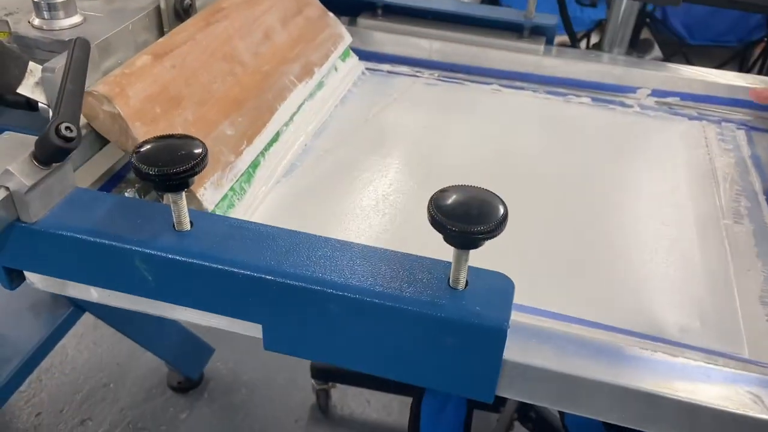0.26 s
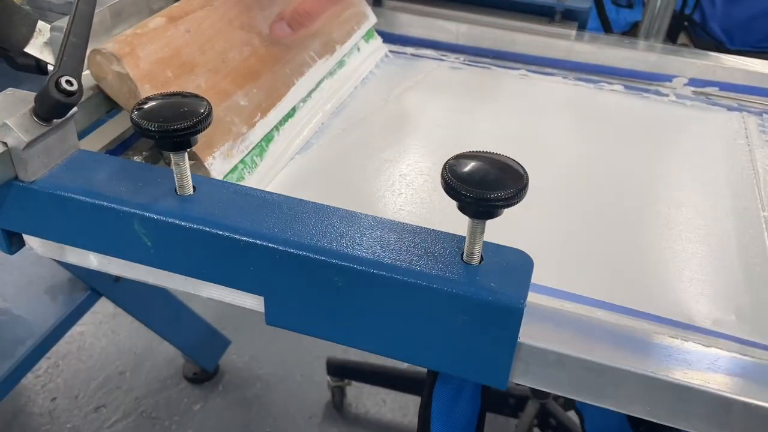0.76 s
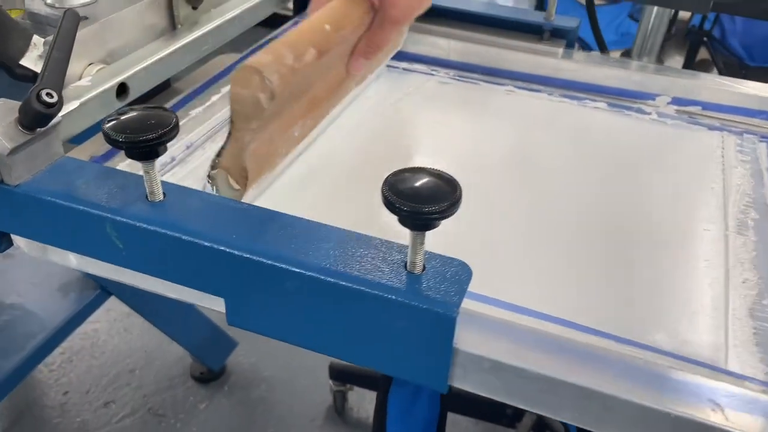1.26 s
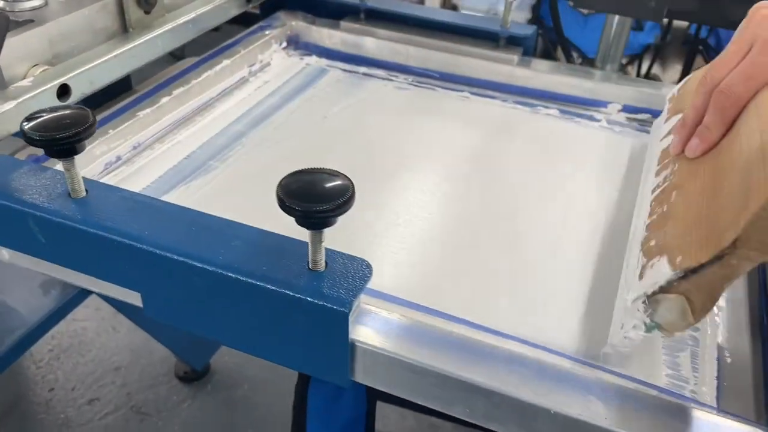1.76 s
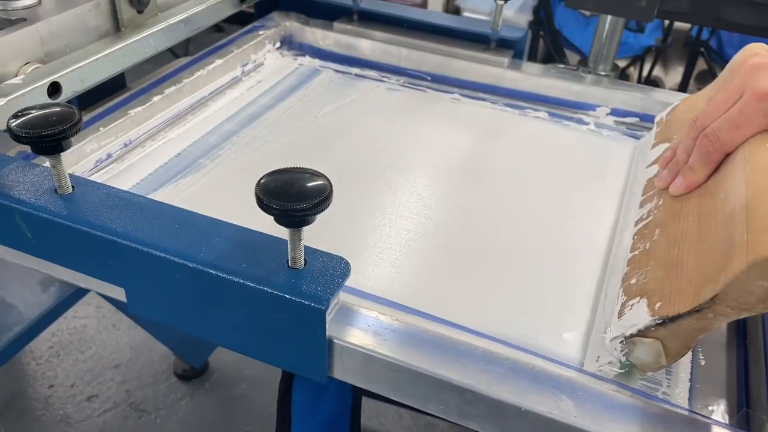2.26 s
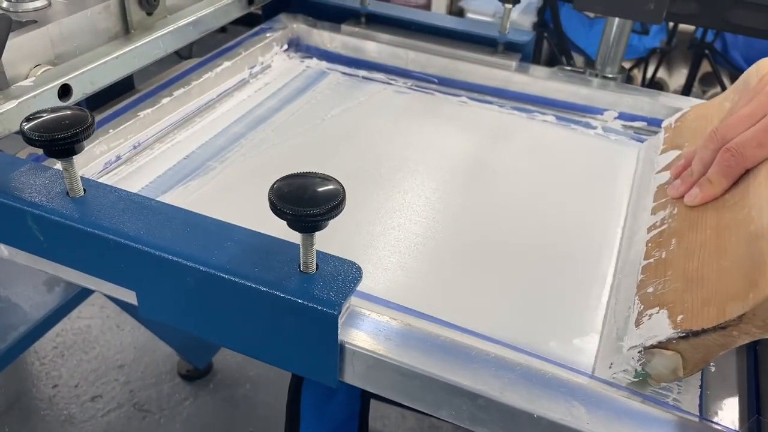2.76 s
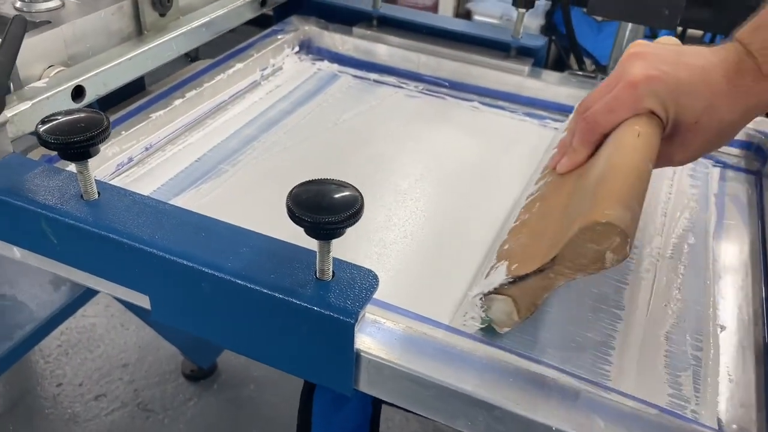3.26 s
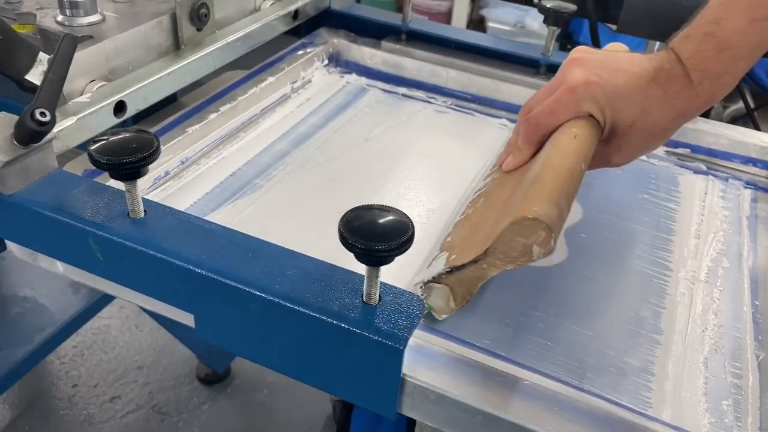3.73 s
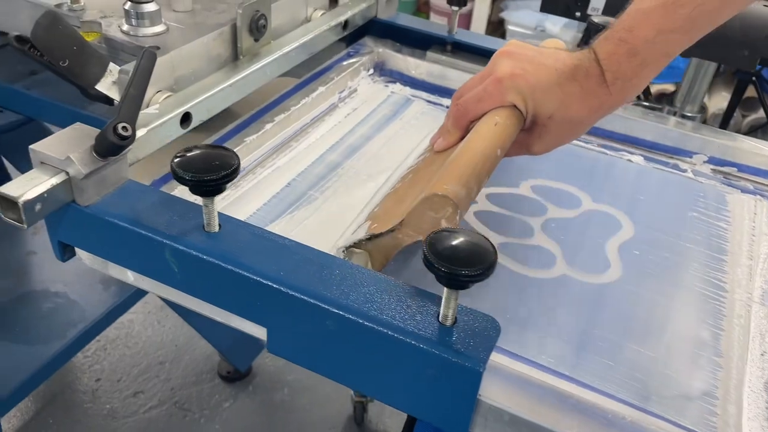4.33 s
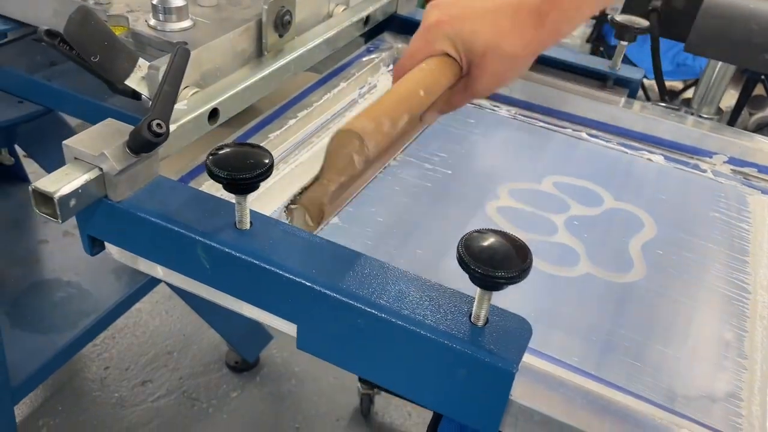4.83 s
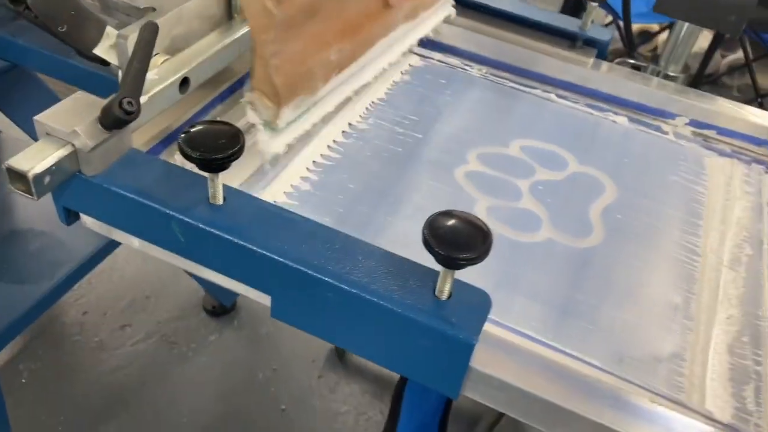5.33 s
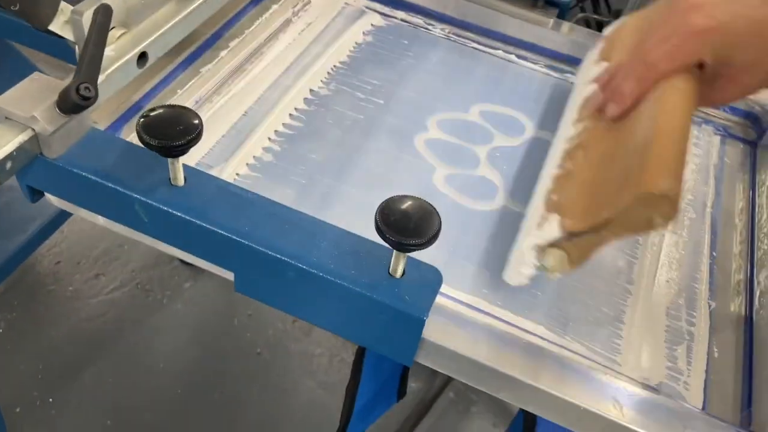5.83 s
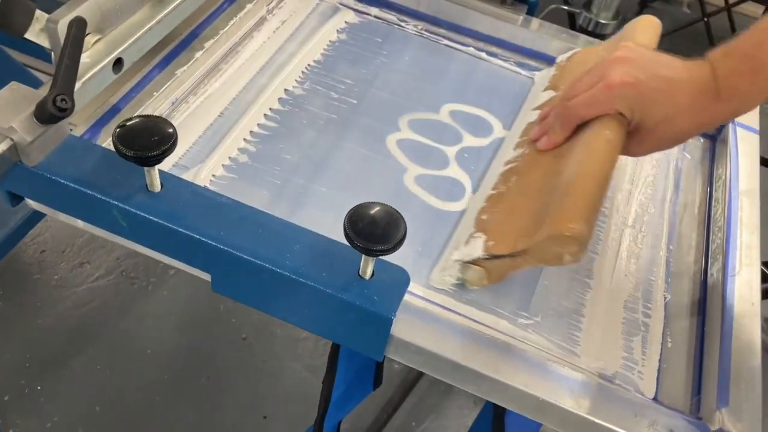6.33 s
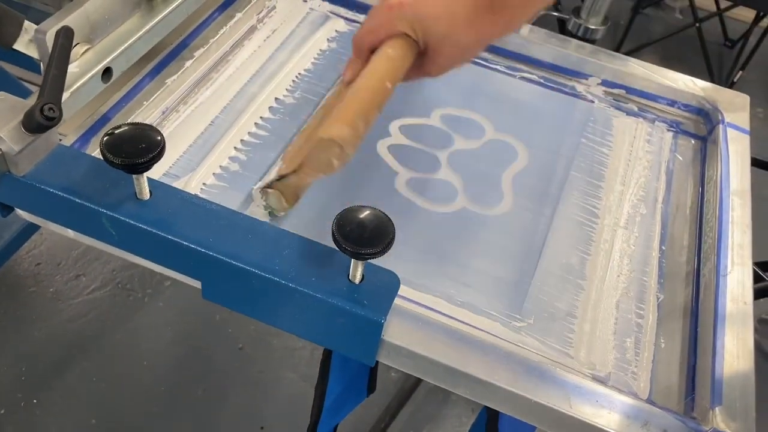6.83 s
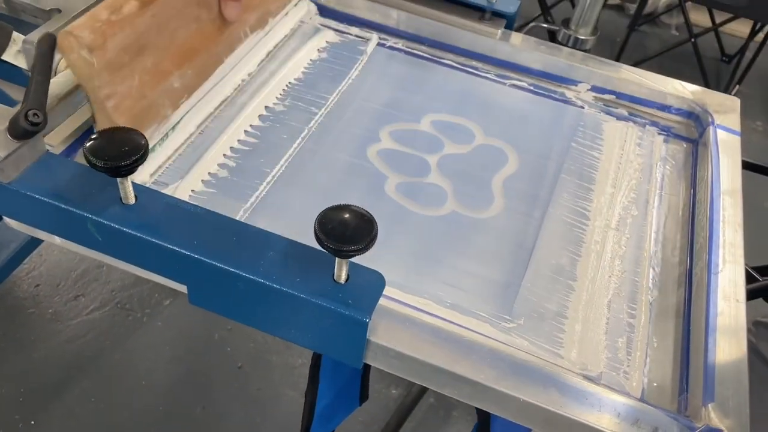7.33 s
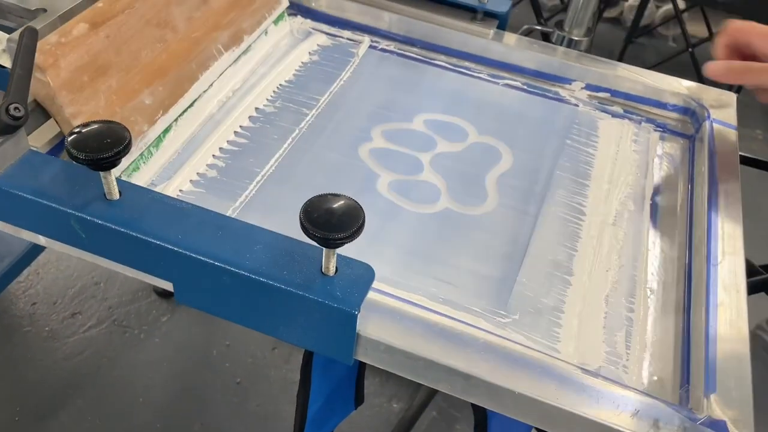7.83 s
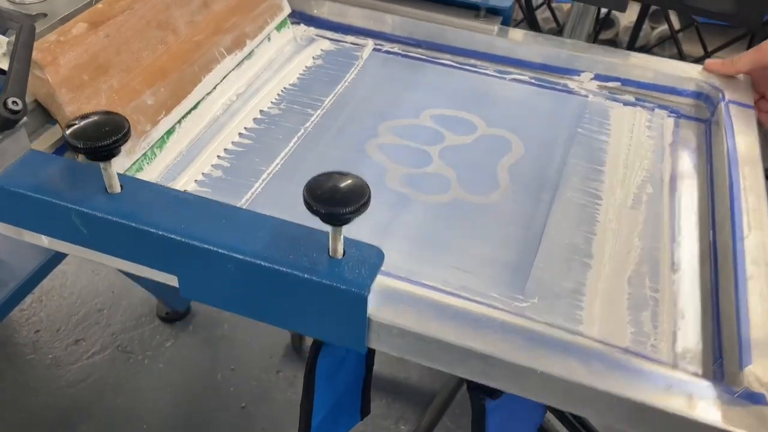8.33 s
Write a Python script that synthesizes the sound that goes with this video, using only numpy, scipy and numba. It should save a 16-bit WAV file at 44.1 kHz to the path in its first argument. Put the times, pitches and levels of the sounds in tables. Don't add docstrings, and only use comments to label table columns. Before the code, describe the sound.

A rubber squeegee sings across an inked mesh screen in two wavering strokes, with knocks, sticky smacks and metal ticks over steady fan rumble.

```python
import sys
import numpy as np
from scipy import signal
from scipy.fft import rfft, irfft
from scipy.io import wavfile
from scipy.ndimage import uniform_filter1d
from numba import njit

SR = 44100
rng = np.random.default_rng(int(sys.argv[2]) if len(sys.argv) > 2 else 0)


def persist_wave(psi):
    counts = np.round(np.clip(psi, -1, 1) * 32767).astype(np.int16)
    wavfile.write(sys.argv[1], SR, np.atleast_2d(counts).T)


def amplitude_ratio(level_db):
    exponent = np.asarray(level_db, float) / 20
    return 10 ** exponent


N = 378364
T = np.arange(N) / SR


def level(x, db):
    return x * amplitude_ratio(db) / np.sqrt(np.mean(x ** 2))


@njit
def svf(x, hz, width_hz):
    y, band_state, low_state = np.empty(len(x)), 0., 0.
    for i in range(len(x)):
        g, damping = np.tan(np.pi * hz[i] / SR), width_hz[i] / hz[i]
        v = (band_state + g * (x[i] - low_state)) / (1 + g * (g + damping))
        band_state = 2 * v - band_state
        low_state = low_state + 2 * g * v
        y[i] = damping * v
    return y


def band(count, hz, share):
    hz = np.clip(hz * np.ones(count), 30, SR / 2.3)
    once = svf(rng.standard_normal(count), hz, share * hz)
    return level(svf(once, hz, share * hz), 0)


def colour(x, table):
    hz, db = np.transpose(table)
    f = np.fft.rfftfreq(len(x), 1 / SR) + 1
    gain_db = np.interp(np.log(f), np.log(hz), db, left=-90, right=-90)
    return irfft(rfft(x) * amplitude_ratio(gain_db), len(x))


def walk(rate_hz):
    k = int(SR / rate_hz)
    held = np.repeat(rng.standard_normal(N // k + 1), k)
    return level(uniform_filter1d(uniform_filter1d(held, k), k)[:N], 0)


def add(out, s, x):
    i = max(int(s * SR), 0)
    out[i:i + len(x)] += x[:len(out) - i]


def dips(rows):
    return sum(db * np.exp(-.5 * (2 * (T - s) / length_s) ** 4) for s, length_s, db in rows)


# f/Hz, density/dB
SHOP_MID = [(20, -45), (40, -5.5), (74, -2.5), (199, -8), (241, -11), (354, -21), (686, -27), (745, -22.5),
            (809, -26.5), (1700, -33.5), (2240, -32.5), (5000, -41), (5700, -47.5), (6730, -45),
            (8620, -66.5), (9900, -55), (13000, -54), (15800, -65)]
# f/Hz, density/dB
SHOP_SIDE = [(12, -48), (20, -25), (65, -2.5), (206, 0.5), (256, -1.5), (582, -8.5), (745, -1), (809, -6),
             (1330, -6), (2000, -14.5), (3650, -19), (6500, -28.5), (9030, -24.5), (11900, -39),
             (14000, -57)]


def shop(mid_db=-42, side_db=-52, duct_hz=2280, duct_db=-69.5):
    mid = level(colour(rng.standard_normal(N), SHOP_MID), mid_db)
    whistle = band(N, duct_hz * (1 + .015 * walk(4)), 0.12)
    mid = mid + amplitude_ratio(duct_db + 2 * walk(1.55)) * whistle
    side = level(colour(rng.standard_normal(N), SHOP_SIDE), side_db)
    return amplitude_ratio(.4 * walk(3)) * np.array([mid + side, mid - side])


def room(x, t60_s=.3, tail_db=-13, low_hz=220, dull_hz=4500):
    t = T[:SR // 2]
    tail = rng.standard_normal((2, len(t))) * 1000. ** (-t / t60_s) * (t > .003)
    tail = signal.lfilter(*signal.butter(2, [low_hz, dull_hz], "band", fs=SR), tail)
    tail = tail * amplitude_ratio(tail_db) / np.sqrt(np.sum(tail ** 2) / 2)
    return signal.fftconvolve(x[None], tail, axes=1)[:, :N]


# t/s, f/Hz, swell width/s, level/dB
SPRING_PARTIALS = [(8.43, 3700, .015, -63), (8.447, 3345, .008, -58), (8.475, 3430, .022, -57),
                   (8.481, 2985, .008, -49), (8.485, 5945, .022, -60), (8.495, 8910, .018, -50),
                   (8.535, 8790, .018, -51), (8.462, 12300, .01, -64), (8.54, 12050, .015, -62),
                   (8.47, 11900, .015, -64), (8.545, 2035, .02, -50), (8.577, 2335, .016, -38),
                   (8.55, 2523, .03, -54), (8.55, 2700, .03, -56), (8.517, 2960, .01, -55),
                   (8.545, 3160, .015, -55), (8.545, 4089, .018, -58), (8.575, 4400, .01, -58),
                   (8.55, 5200, .025, -59), (8.55, 5436, .025, -59), (8.55, 6080, .025, -60),
                   (8.57, 10900, .015, -63), (8.57, 13500, .008, -62), (8.578, 2560, .008, -45),
                   (.525, 13050, .015, -68), (.72, 13400, .015, -66)]


def spring(rough_db=2, rasp_db=-7):
    out, t = np.zeros(N), T[:SR // 4]
    half_s = t[-1] / 2
    for s, hz, width_s, db in SPRING_PARTIALS:
        tone = np.sqrt(2) * amplitude_ratio(rough_db * walk(90)[:len(t)]) * np.sin(2 * np.pi * hz * t)
        rasp = amplitude_ratio(rasp_db) * band(len(t), hz, 0.05)
        swell = np.exp(-.5 * ((t - half_s) / width_s) ** 2)
        add(out, s - half_s, amplitude_ratio(db) * swell * (tone + rasp))
    return out


# t/s, f/Hz, level/dB, t60/s
PINGS = [(.064, 1790, -44, .08), (0.081, 1000, -38, .04), (.086, 676, -40, 0.046), (.103, 1187, -38, .05),
         (.105, 1390, -43, .05), (.172, 813, -30.5, 0.037), (0.171, 1614, -37.5, .07),
         (.173, 2120, -41, .05), (.178, 1156, -36, .045), (8.207, 1470, -46, 0.086),
         (1.387, 1480, -39.5, 0.018), (2.166, 2380, -46, 0.1), (2.164, 2070, -49, .5),
         (2.168, 710, -41, 0.079), (2.187, 720, -38, 0.042), (2.222, 2350, -48, .06),
         (2.2743, 1950, -25.5, 0.011), (2.2795, 1570, -37, .02), (4.815, 375, -29.5, 0.047),
         (5.996, 2200, -29, 0.024), (5.996, 715, -26, 0.059), (6.819, 330, -29.5, 0.064),
         (6.874, 395, -29, 0.055), (7.364, 2030, -33, 0.033), (7.513, 4470, -39.5, 0.031),
         (7.513, 1690, -36, .04)]


def pings(rise_cycles=1.04, rough_db=2):
    out, t = np.zeros(N), T[:SR // 4]
    for s, hz, db, t60_s in PINGS:
        shape = np.minimum(t * hz / rise_cycles, 1) * 1000. ** (-t / t60_s)
        uneven = amplitude_ratio(db + rough_db * walk(250)[:len(t)])
        add(out, s, uneven * shape * np.sin(2 * np.pi * hz * t))
    return out


# t/s, level/dB, centre f/Hz, t60/s
TICKS = [(0.128, -55, 3000, .018), (2.323, -63, 3000, .025), (4.765, -60, 3000, 0.017),
         (4.776, -61, 3000, .018), (4.784, -52, 3000, 0.012), (5.995, -42.5, 3920, 0.016),
         (6.055, -57, 3000, 0.018), (0.2586, -29.5, 2440, 0.0057), (.263, -36.5, 2400, 0.02),
         (4.654, -61, 3000, .015), (4.743, -57, 3000, .015), (7.337, -40.5, 10500, .02),
         (0.271, -46, 2500, 0.025), (0.276, -43, 2500, 0.017), (1.286, -58.5, 3000, 0.044),
         (0.067, -55, 3000, .03)]
SMACKS = [
    (0.061, -47.5, 2200, 0.11),
    (.277, -55, 2300, 0.034),
    (7.331, -36.5, 1310, 0.12),
    (7.361, -37.5, 1960, 0.074),
]
TAPS = [(0.0, -45, 420, 0.5), (.07, -46, 500, 0.43), (.068, -41.5, 1130, 0.42), (.171, -38.5, 1190, 0.11),
        (.258, -34, 1380, 0.018), (1.284, -44.5, 840, 0.25), (1.293, -57, 1570, 0.12),
        (1.291, -43, 453, .15), (.258, -40, 850, 0.018), (2.162, -52.5, 2100, 0.46),
        (2.165, -51, 1290, 0.24), (4.818, -42, 570, 0.19), (5.972, -47, 800, 0.24),
        (6.092, -47, 1500, 0.13), (6.097, -41, 710, 0.064), (7.331, -41.5, 3800, 0.087),
        (8.197, -50, 1840, 0.21), (8.247, -49.5, 1630, 0.1), (8.463, -39.5, 800, 0.069),
        (8.477, -55, 1100, 0.052), (.259, -44, 517, 0.051), (6.003, -40, 626, 0.11),
        (7.516, -40, 1220, 0.08), (7.522, -40, 520, 0.22)]
SCUFFS = [(2.761, -54, 1410, 0.99), (2.93, -40, 1110, 0.23), (2.981, -50, 2900, 0.099),
          (3.209, -50, 1500, 1), (4.672, -40, 324, 0.058), (0.089, -51, 1290, 0.33),
          (4.815, -43.5, 1490, 0.12), (8.47, -47, 387, 0.14)]


def smacks(share=0.66, skirt_db=-6, tear_hz=9900):
    out, t = np.zeros(N), T[:SR // 4]
    # rise/s, tear relative to body/dB
    kinds = [(TICKS, .001, 2), (SMACKS, .005, -11), (TAPS, .0012, -30.5), (SCUFFS, .027, -41)]
    for rows, rise_s, tear_db in kinds:
        for s, db, hz, t60_s in rows:
            shape = np.minimum(t / rise_s, 1) * 1000. ** (-np.maximum(t - rise_s, 0) / t60_s)
            body = band(len(t), hz, share) + amplitude_ratio(skirt_db) * band(len(t), hz, 1.0)
            tear = amplitude_ratio(tear_db + 4.5) * band(len(t), tear_hz, 1.0)
            add(out, s, shape * amplitude_ratio(db) * (body + tear))
    return out


# f/Hz, level/dB, t60/s
SCREEN = [(131.4, 7.5, 0.35), (71, -4.5, 0.42), (212, 7, 0.033), (348, 0.5, 0.065), (700, -21, .05)]
PLATEN = [(132.6, 0.5, 0.19), (199.4, -2, 0.205), (356, -2.5, 0.064), (546, -20, 0.12), (691, -4, 0.073),
          (1070, -18, 0.02), (1410, -7.5, 0.033), (2200, 2, 0.013), (3370, -14, .015)]
RIM = [(197, -4, 0.074), (272, -3.5, 0.061), (402, 6, 0.014), (625, -2, 0.05), (990, -9, 0.027),
       (1520, 1.5, 0.023), (1840, 0, 0.018), (2950, 9, 0.024)]
HANDLE = [(91.5, -12, 0.19), (171, -14, 0.089), (228, -2, 0.04), (305, -2.5, 0.055), (384, 1.5, 0.034),
          (500, -9, 0.16), (635, -9, 0.12), (910, -7, 0.063), (1090, -9.5, 0.042), (4470, -14, .035)]
# t/s, level/dB, push softness/s, build-up/s, crack level/dB
BLOWS = [
    (1.291, -23, 0.0046, 0.01, -41.5),
    (5.995, -17, 0.0006, 0.0081, -22.5),
    (6.887, -24, 0.00056, .005, -25.5),
    (7.513, -16.5, 0.00064, 0.0044, -30),
]


def knocks(spread=0.156, crack_hz=600, crack_t60_s=0.052, crack_rise_s=0.00059, late_cycles=0.64):
    out, t = np.zeros(N), T[:SR // 2]
    for (s, db, push_s, rise_s, crack_db), body in zip(BLOWS, [SCREEN, PLATEN, RIM, HANDLE]):
        ring = np.zeros(len(t))
        for hz, mode_db, t60_s in body:
            peak_s = rise_s + late_cycles / hz
            after_s = t - peak_s
            mates_hz = hz * (1 + spread * min(hz / 400, 1) * rng.uniform(-0.8, 1, (2, 1)))
            cluster = np.sin(2 * np.pi * hz * after_s + 1)
            cluster = cluster + np.sin(2 * np.pi * mates_hz * after_s + 1).sum(0)
            shape = np.minimum(t / peak_s, 1) ** 2 * 1000. ** (-np.maximum(after_s, 0) / t60_s)
            ring = ring + amplitude_ratio(mode_db) * shape * cluster
        push = np.hanning(int(push_s * SR) + 3)
        add(out, s, amplitude_ratio(db - 8.5) * np.convolve(ring, push / push.sum()))
        crack_shape = np.minimum(t / crack_rise_s, 1) * 1000. ** (-t / crack_t60_s)
        add(out, s, amplitude_ratio(crack_db) * band(len(t), crack_hz, 2.02) * crack_shape)
    return out


# t/s, thread rate f/Hz, tremor share of speed
STROKES = [
    [(2.73, 400, 0.0), (2.849, 334, .15), (2.948, 1302, 0.0), (2.979, 1523, .033), (3.06, 1139, .06),
     (3.236, 722, .1), (3.584, 678, .085), (3.908, 985, .03), (4.16, 930, 0.0)],
    [(4.2, 605, .036), (4.297, 746, .066), (4.354, 586, 0.0), (4.441, 913, .019), (4.623, 703, .018),
     (4.71, 370, .1)],
    [(6.08, 634, 0.0), (6.173, 776, .072), (6.208, 1447, .08), (6.291, 1207, .024), (6.369, 2148, 0.0),
     (6.474, 1787, .1), (6.69, 1601, .07), (6.784, 1165, .137), (6.84, 355, 0.0)],
]
# rate f/Hz, crest t/s
TREMOR = [
    (11.98, 3.429),
    (10.84, 4.466),
    (11.59, 6.511),
]
# t/s, length/s, share of speed gained
LURCHES = [(3.185, .03, .1), (3.285, .035, -.32), (3.335, .03, .1), (3.415, .055, .17), (3.757, .05, .09),
           (3.845, .06, -.11), (6.228, .03, .04), (6.51, .03, .03), (6.738, .025, -.05), (6.765, .02, .04),
           (2.91, .03, -.1), (3.022, .03, -.08), (3.14, .025, -.04), (3.25, .03, -.05), (3.4, .025, .08),
           (3.45, .03, -.1), (3.54, .022, -.09), (3.59, .03, -.05), (3.675, .035, -.09), (3.8, .02, .04),
           (3.865, .02, -.05), (3.905, .028, .07), (3.985, .02, -.025), (4.02, .02, .03), (4.08, .06, .055),
           (4.34, .02, .07), (4.38, .02, -.05), (4.54, .025, .04), (4.69, .02, -.22), (6.165, .03, -.1),
           (6.42, .02, -.025), (6.522, .02, -.04), (6.72, .022, .08), (6.82, .02, -.3), (3.56, .02, .06),
           (3.838, .03, .04), (3.695, .014, -.06), (4.312, .02, -.05), (4.565, .016, -.04),
           (4.667, .025, .22)]


def travel():
    rows = np.vstack(STROKES)
    hz, tremor = (np.interp(T, rows[:, 0], c) for c in rows[:, 1:3].T)
    push = np.searchsorted([stroke[0][0] for stroke in STROKES[1:]], T)
    rate_hz, crest_s = np.array(TREMOR)[push].T
    lurch = sum(share * np.exp(-.5 * (2 * (T - s) / length_s) ** 2) for s, length_s, share in LURCHES)
    hz = hz * (1 + tremor * np.cos(2 * np.pi * rate_hz * (T - crest_s)) + lurch)
    moving = ((T > 2.745) & (T < 4.72)) | ((T > 6.08) & (T < 6.84))
    return uniform_filter1d(hz, 400), uniform_filter1d(1. * moving, 600)


# tone level/dB, overtone level/dB
PRESSURE = [(-50, -84), (-49, -44), (-47.5, -57), (-44, -58), (-42.5, -55), (-47, -66.5), (-46.5, -48.5),
            (-50, -55), (-50.5, -79), (-48.5, -48), (-58, -61), (-51, -52.5), (-49.5, -64), (-46.5, -53),
            (-61, -81), (-50, -69), (-56.5, -60), (-48.5, -61), (-46, -78), (-58.5, -59), (-42, -58),
            (-46, -59.5), (-54, -60), (-57, -58)]


def pressure():
    times_s = np.vstack(STROKES)[:, 0]
    return [np.interp(T, times_s, column) for column in np.transpose(PRESSURE)]


# f/Hz, density/dB
SHEAR_COLOUR = [(300, 12.5), (800, 2.5), (2000, 0), (4000, -4.5), (6500, -7), (9000, -0.5), (13000, -5.5),
                (16000, -4.5)]
# peak t/s, level/dB, rise/s,
# fall/s
RUSTLES = [(0.0, -54.5, .01, 0.015), (0.067, -56.5, .003, 0.033), (.279, -52, 0.021, 0.0049),
           (.722, -72, 0.16, .008), (.918, -69, 0.091, 0.02), (1.05, -74, .03, .012),
           (2.16, -69.5, 0.054, .13), (2.304, -84, .005, .08), (2.95, -68, 0.02, 0.04),
           (3.06, -73, 0.052, 0.1), (3.16, -72, 0.06, 0.034), (3.3, -80, 0.041, 0.062),
           (3.4, -73, 0.045, 0.079), (4.66, -88, 0.089, .008), (4.78, -66, 0.055, 0.025),
           (4.838, -54, 0.007, 0.011), (4.859, -51, 0.015, 0.0034), (6.06, -68, .02, 0.084),
           (6.24, -64, 0.067, 0.075), (6.844, -64, 0.19, 0.065), (7.38, -76, 0.013, 0.042),
           (7.45, -65, 0.023, 0.025), (8.05, -68, 0.031, 0.061), (8.198, -64.5, 0.012, 0.033),
           (8.458, -62, 0.021, 0.03), (8.58, -61, 0.064, .012)]


def shear(hz, moving, shear_db=-69, db_per_octave=7, gain_db=10, crackle_db=2):
    speed = uniform_filter1d(hz, SR // 10) / 1000
    gain = moving * amplitude_ratio(shear_db + db_per_octave * np.log2(speed))
    for s, db, rise_s, fall_s in RUSTLES:
        gain = gain + amplitude_ratio(db) * np.exp(-np.abs(T - s) / np.where(T < s, rise_s, fall_s))
    grains = rng.standard_normal(N) * amplitude_ratio(crackle_db * walk(400))
    return level(colour(grains, SHEAR_COLOUR), gain_db) * gain * amplitude_ratio(1.5 * walk(25))


def chatter(hz, moving, db=-15, above=1.5, share=1.35, grain_db=3.5):
    tone_db, _ = pressure()
    return np.array([amplitude_ratio(tone_db + db + grain_db * walk(90)) * band(N, above * hz, share) * moving
                     for port in "LR"])


# middle t/s, length/s, from f/Hz, to f/Hz, level/dB
FORKS = [(2.955, 0.026, 680, 760, -47), (2.96, 0.03, 927, 1600, -42), (2.91, 0.025, 1800, 2000, -51.5),
         (2.958, 0.02, 1600, 2200, -51), (3.012, 0.016, 2700, 3100, -64), (3.005, 0.016, 1400, 1430, -37),
         (3.292, 0.023, 1030, 1400, -46.5), (3.377, 0.055, 2250, 2050, -63), (2.99, 0.027, 4600, 4300, -60),
         (3.07, 0.023, 4320, 4340, -63), (3.24, .04, 1200, 1050, -50), (11, .025, 1100, 1600, -58),
         (6.131, 0.017, 410, 870, -47), (6.249, 0.016, 1640, 1640, -39), (6.264, 0.027, 1700, 1400, -45),
         (6.299, 0.02, 1800, 3900, -61), (6.455, 0.027, 1700, 1850, -44), (6.782, 0.027, 1300, 1100, -42.5)]


def forks(rough_db=3.5):
    out, t = np.zeros(N), T[:SR // 5]
    half_s = t[-1] / 2
    for s, length_s, from_hz, to_hz, db in FORKS:
        u = (t - half_s) / length_s
        phase = 2 * np.pi * np.cumsum(np.interp(u, [-.5, .5], [from_hz, to_hz])) / SR
        gain = np.sqrt(2) * amplitude_ratio(db + rough_db * walk(156)[:len(t)])
        add(out, s - half_s, gain * np.exp(-2 * u ** 2) * np.sin(phase))
    return out


# t/s, length/s, drop/dB
SLIPS = [(2.786, 0.084, -3.5), (2.877, 0.079, 5), (2.987, 0.021, -11.5), (3.104, 0.0012, 11),
         (3.153, 0.07, -2), (3.211, 0.035, 9), (3.3, 0.021, 9), (3.333, 0.04, -3.5), (3.452, 0.022, 9),
         (3.588, 0.014, 13), (3.626, 0.015, 19), (3.712, 0.017, -1.5), (3.815, 0.011, 13),
         (3.965, 0.026, -6.5), (4.192, 0.052, 12.5), (4.26, 0.012, 11), (4.383, 0.022, 3),
         (4.565, 0.014, -2), (6.122, 0.013, 13), (6.133, 0.025, -11.5), (6.188, 0.013, 5),
         (6.488, 0.0088, 12), (6.524, 0.044, -2), (6.67, 0.026, -3), (6.801, 0.018, -9), (2.966, 0.021, 0),
         (3.01, .008, 4), (3.026, 0.0064, 10), (3.06, 0.015, 3), (3.11, 0.081, -3), (3.384, .025, -5.5),
         (3.48, 0.018, 2.5), (3.604, 0.011, -2), (3.76, 0.056, 5), (3.958, 0.018, -4.5), (4.04, 0.023, 2),
         (4.3, 0.022, -5.5), (4.348, .025, -2), (4.402, 0.017, -0.5), (4.432, 0.02, 5),
         (4.622, 0.018, 10.5), (4.638, 0.017, -5.5), (6.204, 0.017, -4), (6.222, 0.014, 5),
         (6.281, 0.018, 7), (6.294, 0.018, -6.5), (6.386, 0.017, -9.5), (6.554, 0.017, 1),
         (6.594, 0.028, -4), (6.629, 0.018, 7), (6.658, 0.018, 10), (6.75, 0.014, 0), (6.15, 0.046, 2.5),
         (3.852, 0.026, 3), (3.934, 0.0085, 6), (3.98, 0.0082, -1), (4.1, 0.03, 0), (4.37, 0.016, -2),
         (4.492, 0.012, 5), (4.135, 0.025, -2)]
# t/s, length/s, drop/dB
BREAKS = [(2.95, .05, 5), (3.15, 0.033, 5), (3.375, 0.029, 4), (3.47, 0.028, -6.5), (3.515, 0.032, 3),
          (3.69, 0.049, 6), (3.772, .025, 2), (3.8, .015, -1), (3.92, 0.027, 8), (3.995, .03, -14),
          (4.34, 0.016, 4), (4.49, 0.038, 6), (4.61, 0.028, -4), (6.3, 0.072, -4), (6.52, 0.042, -0.5),
          (6.72, 0.051, -5)]
# f/Hz, gain/dB
OVERTONE_COLOUR = [(600, -10.5), (2200, 8.5), (2900, -3.5), (4500, 3.5), (5400, 4), (6200, -7)]


def blade(hz, moving, flutter_db=2.2, patchy_db=3, smear_db=-8, far_db=-18, far_lag_s=0.0283, stray=.03):
    tone_db, second_db = pressure()
    second_db = second_db - dips(BREAKS)
    slow = np.clip(1400 / hz, .5, 2.5)
    jerk_db = np.clip(1.5 * np.abs(np.gradient(np.log(hz))) * SR - 9, 0, 4.5)
    phase = 2 * np.pi * np.cumsum(hz * (1 + .013 * slow * walk(70))) / SR

    out = amplitude_ratio(tone_db + smear_db) * band(N, hz, 0.1 * slow)
    out += amplitude_ratio(second_db + smear_db + 2) * band(N, 2 * hz, 0.12 * slow)
    out += np.sqrt(2) * amplitude_ratio(tone_db - flutter_db * slow * np.abs(walk(110)) + 6.5) * np.sin(phase)

    for side in [-1, 1]:
        stray_hz = hz * (1 + side * stray * slow * (1.5 + walk(35)))
        strand = 2 * np.pi * np.cumsum(stray_hz) / SR
        wave = np.sin(strand) + amplitude_ratio(second_db - tone_db - 5) * np.sin(2 * strand)
        out += amplitude_ratio(tone_db - 7 + patchy_db * walk(50)) * wave

    far_hz = np.interp(T - far_lag_s, T, hz)
    out += amplitude_ratio(tone_db + far_db + patchy_db * walk(20)) * band(N, far_hz, 0.08)

    for harmonic, db in [(2, 0), (3, -14), (4, -22)]:
        db = db + np.interp(harmonic * hz, *np.transpose(OVERTONE_COLOUR))
        gain = np.sqrt(2) * amplitude_ratio(second_db + db - jerk_db + patchy_db * walk(70))
        out += gain * np.sin(harmonic * phase)
    return out * amplitude_ratio(-dips(SLIPS)) * moving


# f/Hz, gap/rad
PORT_GAP = [(0, 0), (1300, -.3), (2000, -.8), (3000, 1.4), (4300, .8), (5300, .9), (5800, -1.5),
            (6500, -1.1), (7600, -3), (9600, -3.28), (12500, -5.6), (16000, -6.1)]
# f/Hz, gap/dB
LEAN = [(60, 0), (110, 3), (200, -1.5), (380, -5.5), (700, 6), (1290, 0.5), (2380, 4.5), (4400, 9.5),
        (8120, 2.5), (10000, 3.5), (15000, -3.5)]


def ports(x):
    f = np.fft.rfftfreq(N, 1 / SR)
    turn = np.exp(.5j * np.interp(f, *np.transpose(PORT_GAP)))
    half = turn * amplitude_ratio(np.interp(f, *np.transpose(LEAN)) / 2)
    return irfft(rfft(x) * np.array([half, 1 / half]), N)


def scene():
    hz, moving = travel()
    edge = blade(hz, moving) + forks()
    rest = shear(hz, moving) + knocks() + smacks() + pings() + spring()
    return shop() + room(amplitude_ratio(-3) * edge + rest) + chatter(hz, moving) + ports(edge + rest)


def low_pass(x):
    return signal.sosfilt(signal.butter(12, 16450, fs=SR, output="sos"), x)


def record(dry):
    top = signal.butter(10, 14400, fs=SR, output="sos")
    mix = signal.sosfilt(top, dry)
    return low_pass(mix)


dry = scene()
out = record(dry)
persist_wave(out)
```